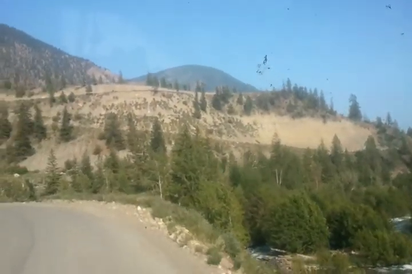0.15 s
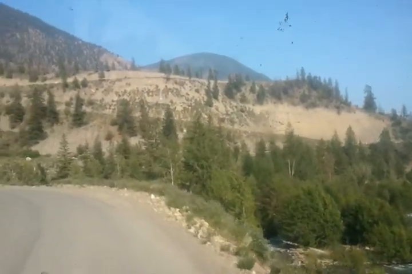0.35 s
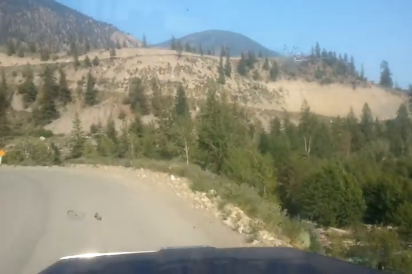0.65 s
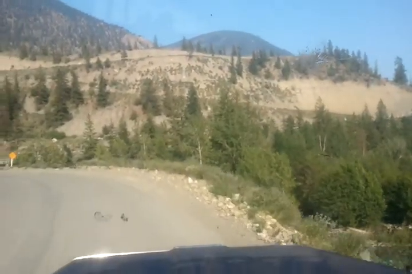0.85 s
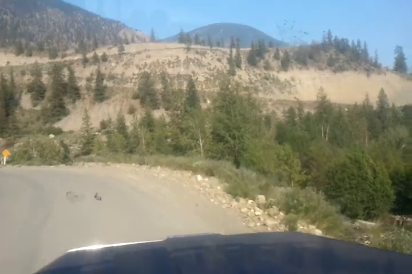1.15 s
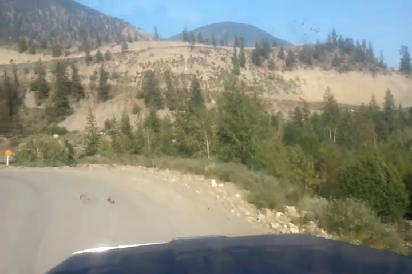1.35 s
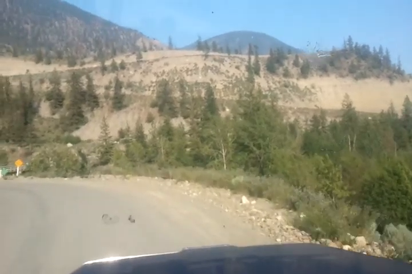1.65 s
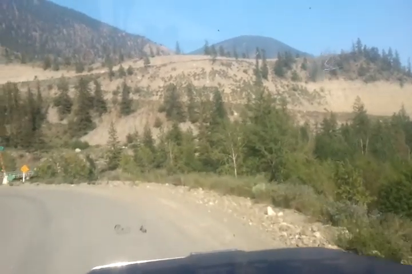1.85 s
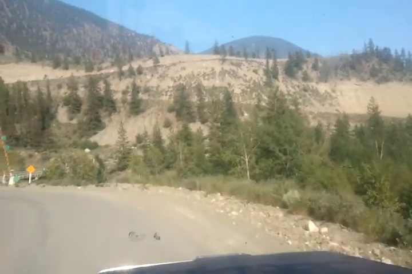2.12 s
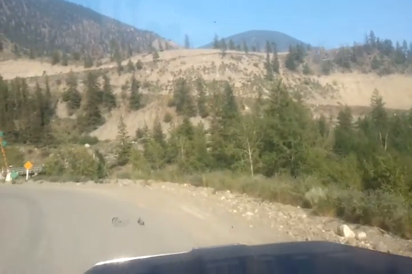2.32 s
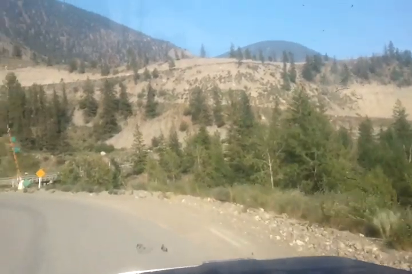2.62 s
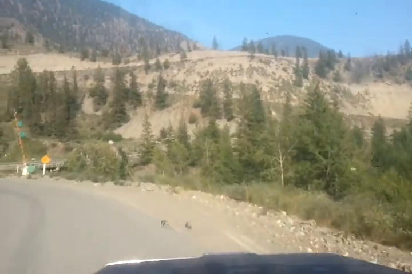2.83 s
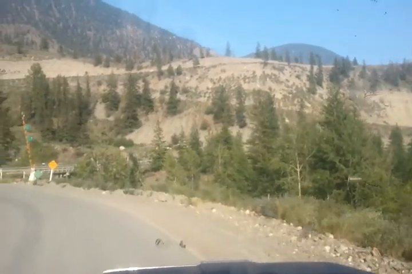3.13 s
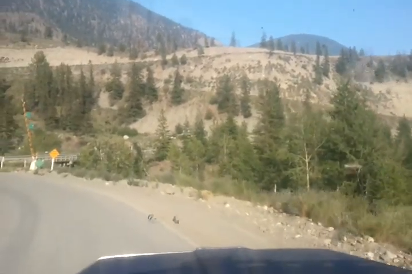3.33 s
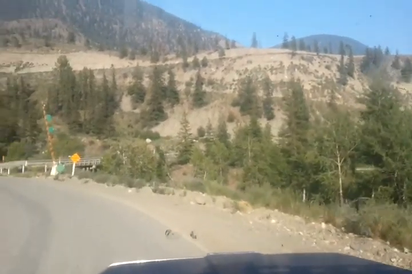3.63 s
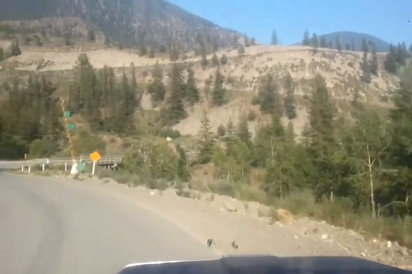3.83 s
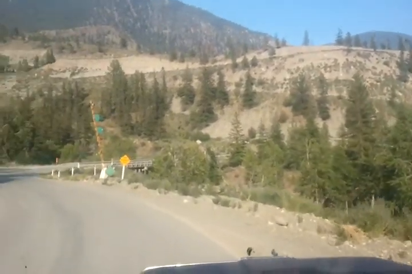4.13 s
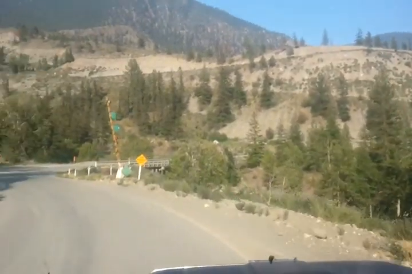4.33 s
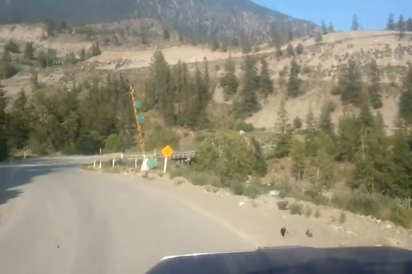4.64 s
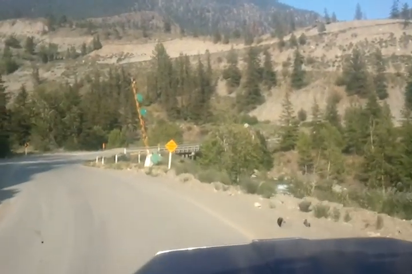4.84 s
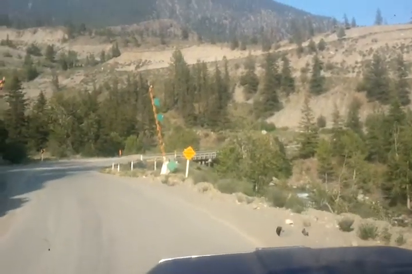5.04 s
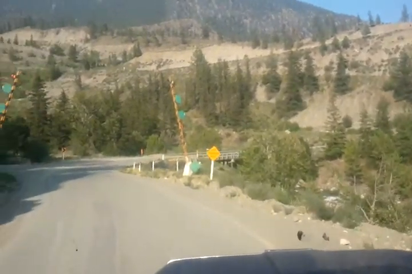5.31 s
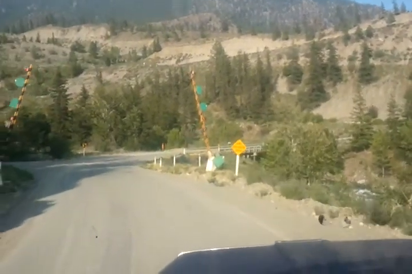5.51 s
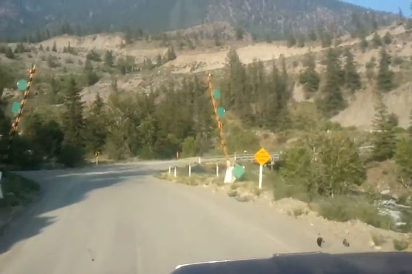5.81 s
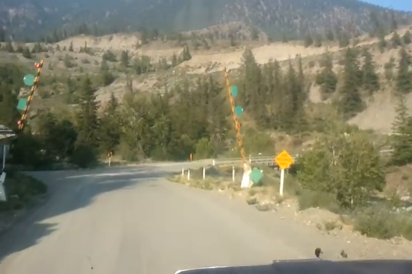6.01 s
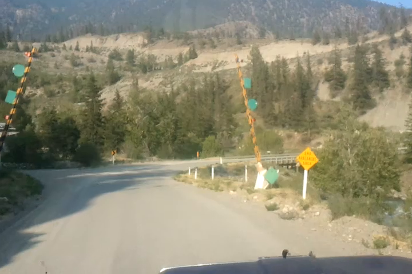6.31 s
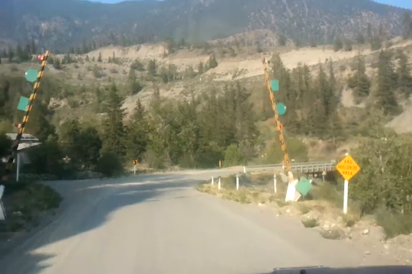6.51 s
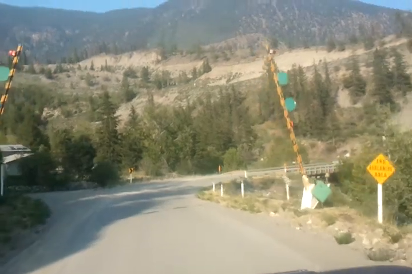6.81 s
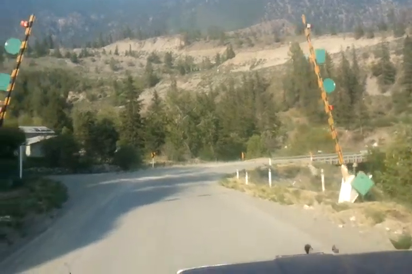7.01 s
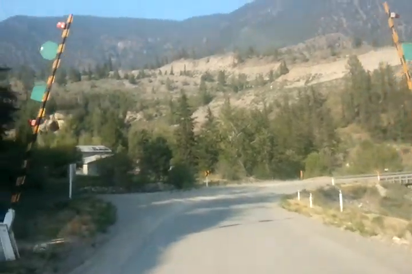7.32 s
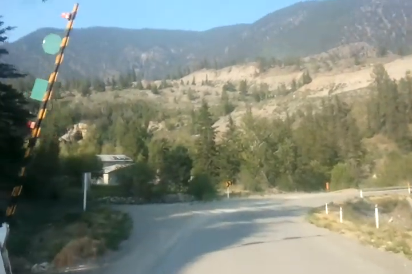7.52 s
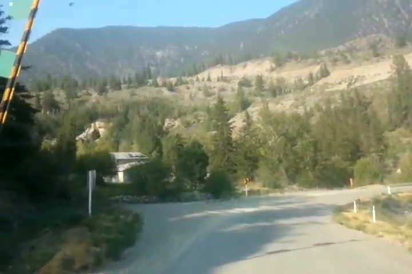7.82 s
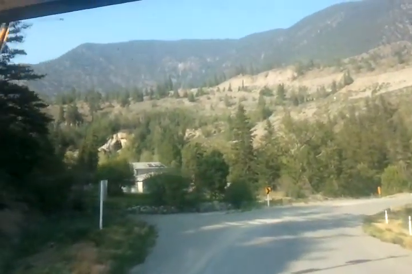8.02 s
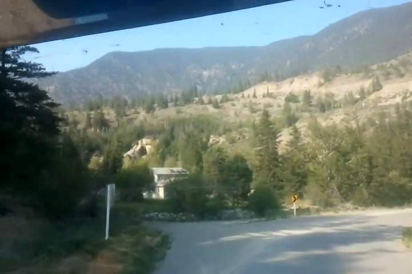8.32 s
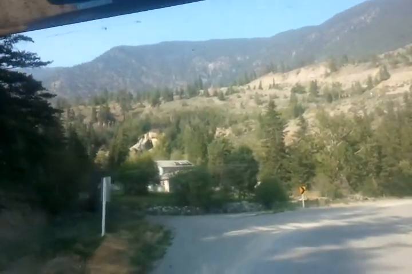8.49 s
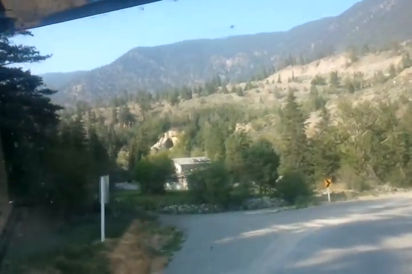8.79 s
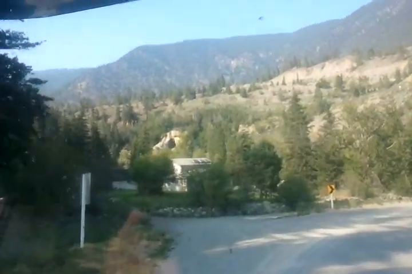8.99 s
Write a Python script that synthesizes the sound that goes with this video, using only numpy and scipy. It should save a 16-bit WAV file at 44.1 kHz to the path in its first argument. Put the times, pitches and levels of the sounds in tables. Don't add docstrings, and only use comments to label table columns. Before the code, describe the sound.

From the start, the cab of a six-cylinder diesel truck is filled by an exhaust brake: a very loud, low, throbbing drone of about forty-five pulses a second, uneven from cylinder to cylinder, clipped into a harsh buzz by a small microphone. Air hiss and cab noise break through in flutters, and plastic trim rattles irregularly; a small jolt comes near 1.0. The pitch sinks gradually until about 4.9, when the brake lets go with a brief low tail. From 5.1 it is far quieter: muffled road rumble, soft diesel clatter, faint whines and a low shudder. The engine pulls lightly, eases around 6.6, then hums more strongly from 7.2 to 8.3, rising slightly. At 8.33 the brake bites again, loud and distorted, as wheels thud rapidly over grid bars with a sharp trim knock near 8.53. By 9.0 it releases, leaving rumble and a faint engine.

```python
import sys
import numpy as np
from scipy import signal
from scipy.fft import rfft, irfft, next_fast_len
from scipy.io import wavfile
from scipy.ndimage import uniform_filter1d, map_coordinates

SR = 44100
rng = np.random.default_rng(int(sys.argv[2]) if len(sys.argv) > 2 else 0)


def to_linear_factor(level_db):
    exponent = np.asarray(level_db, float) / 20
    return 10 ** exponent


def digitize_waveform(pressure):
    field = np.atleast_2d(pressure).T
    bounded = np.clip(field, -1, 1)
    quanta = np.round(bounded * 32767).astype(np.int16)
    wavfile.write(sys.argv[1], SR, quanta)


N = 403515

# (time [s], firing rate [1/s])
SPEED_ROWS = [
    (0, 45.38),
    (2.2, 42.73),
    (4.1, 40.8),
    (5.1, 40.53),
    (6.5, 41.42),
    (8.2, 42.67),
    (8.55, 41.83),
    (8.9, 40.95),
    (9.15, 39.89),
]
# (on [s], off [s], linger [s], boom [dB])
BRAKE_SPANS = [
    (-1, 4.92, .068, 0),
    (8.328, 8.935, .04, 2.5),
]
# (lag [firings], push [dB], pipe ring [dB])
PULSE_RISES = [(.032, 9.2, .9), (.085, 3, -15.6), (-.048, 4.9, -6.7), (.023, 9, -.3), (.02, 8.2, -5.6),
               (-.026, 11.6, -4.4)]
# (lag [firings], push [dB], pipe ring [dB])
PULSE_FALLS = [(.061, 7.6, -6.4), (.01, 1.6, -14.4), (.02, 12.2, 5), (.029, 8.9, -8.7), (.023, 11.2, -3.5),
               (.02, 10.4, 1.4)]
# (frequency [Hz], density [dB/Hz])
BLOW_OFF_SPECTRUM = [(40, -36.5), (150, -2), (400, -9.5), (700, -29), (1100, -21), (1700, -37), (2700, -25),
                     (4000, -27), (4500, -31.5), (5800, -30.5), (6400, -26), (7500, -30), (10000, -16.5),
                     (20000, -120)]
# (time [s], firing tone [dB])
PULL_LEVELS = [
    (5.05, -30),
    (5.3, -23),
    (5.5, -17),
    (6.2, -14),
    (6.65, -19),
    (7.25, -10.5),
    (8.3, -8.5),
    (9.0, -20),
    (9.15, -26.5),
]
# (multiple of firing rate [-], level [dB])
CRANK_ORDERS = [(3 / 6, -30.5), (7 / 6, -33.5), (8 / 6, -36.5), (19 / 6, -37), (21 / 6, -32),
                (9 / 6, -27.5), (11 / 6, -27.5), (12 / 6, -26.5), (14 / 6, -36.5), (15 / 6, -28.5),
                (28 / 6, -35)]
# (start [s], end [s], first pitch [Hz], last pitch [Hz], level [dB])
SHUDDER_GLIDES = [
    (5.1, 5.8, 32.6, 33.7, -18),
    (6.3, 6.9, 32, 21.5, -17),
]
# (frequency [Hz], density [dB/Hz])
RUMBLE_SPECTRUM = [(8, -42), (20, -3), (30, -1.5), (45, -13), (65, -7.5), (95, -7), (160, -7.5), (200, -9),
                   (260, -11), (430, -13), (620, -30), (900, -48.5), (2000, -120)]
# (frequency [Hz], density [dB/Hz])
CLATTER_SPECTRUM = [(290, -39), (500, -7), (680, -7), (970, -3), (1470, -5), (1650, -9.5), (1950, -9.5),
                    (2600, -16.5), (3600, -19.5), (4700, -26.5), (6000, -28), (7500, -25.5), (9000, -25),
                    (18700, -120)]
# (centre [Hz], width [Hz], lift over the noise [dB])
PANEL_MODES = [(200, 30, 0), (373, 11, 4.5), (428, 15, 4), (485, 10, 4.5), (766, 30, 4), (1003, 120, 1.5),
               (1200, 52, 1.5), (1490, 27, -1), (1975, 44, 4), (3390, 56, 0.5), (6260, 250, 2),
               (670, 110, -2), (1207, 28, -7)]
# (start [s], end [s], first pitch [Hz], last pitch [Hz], level [dB])
WHINE_GLIDES = [(5.35, 6.1, 200, 200, -27), (6.45, 7.1, 200, 205, -28), (7.5, 9.3, 198, 202, -28),
                (8.5, 9.3, 205, 200, -20), (4.94, 5.4, 436, 422, -30), (6.35, 8.5, 431, 430, -33),
                (4.94, 8.2, 1000, 1008, -33), (7.6, 8.4, 1150, 1180, -37), (8.93, 9.4, 1130, 1030, -32),
                (5.9, 8.5, 1488, 1515, -37), (4.93, 5.3, 1988, 1960, -33), (5.2, 5.8, 1955, 1915, -41),
                (5.15, 5.7, 3424, 3395, -47), (6.7, 7.5, 3390, 3345, -50), (4.95, 5.45, 3720, 3610, -46)]
# (time [s], peak [dB], ring [Hz])
RATTLE_HITS = [(0.028, -10.5, 900), (0.08, -11, 887), (0.257, -3, 756), (0.525, -10.5, 956),
               (0.66, -8, 1030), (0.929, -7, 1140), (0.996, -15, 766), (1.132, -16, 763),
               (1.203, -7.5, 1145), (1.612, -12, 1144), (1.682, -13.5, 1086), (1.75, -21, 1083),
               (1.888, -8.5, 990), (1.995, -14, 910), (2.169, -14.5, 870), (2.239, -11, 748),
               (2.309, -6.5, 1077), (2.44, -12, 1100), (2.522, -14.5, 1080), (2.617, -20, 850),
               (2.737, -13, 1070), (2.806, -15, 832), (2.864, -12, 793), (2.915, -14, 1135),
               (3.222, -14, 1490), (3.525, -9, 1010), (3.719, -9.5, 1100), (3.817, -7, 1057),
               (4.293, -17, 844), (4.403, -13.5, 1007)]
# (time [s], peak [dB], thud [Hz], t60 [s], trim knock [dB])
JOLT_HITS = [(.997, 2.5, 293, 0.06, -12), (8.336, 5.5, 214.4, 0.19, -7.5), (8.352, 3.5, 294, 0.11, -14.5),
             (8.43, -12, 253, .08, -22), (8.478, -6.5, 289, 0.11, -18), (8.5323, 6, 206.6, 0.16, 3),
             (8.545, -4.5, 258, 0.054, -14.5), (8.566, 4, 244, 0.076, -10.5), (8.602, 4, 200, 0.046, -15.5),
             (8.65, -7.5, 258, 0.044, -20.5), (8.706, -0.5, 213, 0.18, -27.5), (8.765, 0.5, 201, 0.16, -30),
             (8.832, -1.5, 252, 0.089, -29)]
# (frequency [Hz], density [dB/Hz])
SMEAR_SPECTRUM = [(300, -48.5), (1500, -2), (3000, -5), (7000, -5.5), (8500, -8.5), (10000, -66.5),
                  (20000, -120)]


def seconds(count=N):
    return np.arange(count) / SR


def unit(x):
    return x / np.sqrt(np.mean(x ** 2) + 1e-20)


def curve(rows):
    s, value = np.transpose(rows)
    return np.interp(seconds(), s, value)


def wobble(rate_hz, count=N):
    knots = rng.standard_normal(int(count * rate_hz / SR) + 4)
    return map_coordinates(knots, [np.arange(count) * rate_hz / SR])


def filtered(x, response):
    m = next_fast_len(N + 8192)
    return irfft(rfft(x, m) * response(np.fft.rfftfreq(m, 1 / SR)), m)[:N]


def noise(spectrum, modes=()):
    hz, db = np.transpose(spectrum)

    def response(f):
        bumps_db = sum(lift_db / (1 + (2 * (f - centre) / width) ** 2) for centre, width, lift_db in modes)
        return to_linear_factor(np.interp(np.log(f + 1), np.log(hz), db) + bumps_db)

    return unit(filtered(rng.standard_normal(N), response))


def glide(start_s, end_s, hz, last_hz):
    t = seconds(round((end_s - start_s) * SR))
    rise_s, fade_share = .06, .4
    size = np.clip(np.minimum(t / rise_s, (t[-1] - t) / (fade_share * t[-1])), 0, 1)
    turn = 2 * np.pi * np.cumsum(np.linspace(hz, last_hz, len(t))) / SR
    return round(start_s * SR), turn, size


def braking():
    bite_s, build_s, drop_s, stop_s = .035, .15, .045, .02
    bite, low = to_linear_factor(-5.5), to_linear_factor(-12.5)
    pressure = np.zeros(N)
    for on_s, off_s, linger_s, db in BRAKE_SPANS:
        hold_s = off_s - on_s - bite_s - build_s
        knots_s = np.cumsum([on_s, bite_s, build_s, hold_s, drop_s, linger_s, stop_s])
        pressure += to_linear_factor(db) * np.interp(seconds(), knots_s, [0, bite, 1, 1, low, low, 0])
    return pressure


def cab(firings):
    rumble_db, clatter_db, braked_db, settle_s = -20.5, -25.6, 4, 1.1
    braked = np.clip(braking(), 0, 1)
    grid_db = np.interp(seconds(), [8.3, 8.6, 9.2], [0, 7, 0])
    rumble_db = rumble_db + braked_db * braked + grid_db
    clatter_db = clatter_db + braked_db * uniform_filter1d(braked, round(settle_s * SR))
    rumble = to_linear_factor(rumble_db + 1.2 * wobble(8.1)) * noise(RUMBLE_SPECTRUM, PANEL_MODES)
    pulse = unit(np.exp(0.063 * np.cos(2 * np.pi * (firings - 0.14))))
    pulse = pulse * to_linear_factor(0.64 * wobble(6.1) + 0.3 * wobble(90))
    return rumble + to_linear_factor(clatter_db) * unit(pulse * noise(CLATTER_SPECTRUM, PANEL_MODES))


def whines():
    out = np.zeros(N + SR)
    for start_s, end_s, hz, last_hz, db in WHINE_GLIDES:
        at, turn, size = glide(start_s, end_s, hz, last_hz)
        flutter_hz = 16 + hz / 50
        in_phase = (.6 + wobble(flutter_hz, len(turn))) * np.cos(turn)
        quadrature = wobble(flutter_hz, len(turn)) * np.sin(turn)
        out[at:at + len(turn)] += to_linear_factor(db) * size * (in_phase + quadrature)
    return out[:N]


def rattles():
    out, t = np.zeros(N + SR), seconds(SR // 20)
    envelope = to_linear_factor(-60 * t / .014) * (1 - np.exp(-t / .0006))
    for s, db, hz in RATTLE_HITS:
        at = round(s * SR)
        out[at:at + len(t)] += to_linear_factor(db + 4.5) * np.sin(2 * np.pi * hz * t) * envelope
    return out[:N]


def jolts():
    out, t = np.zeros(N + SR), seconds(SR // 4)
    knock = np.sin(2 * np.pi * 1050 * t) + .6 * np.sin(2 * np.pi * 690 * t)
    knock = knock * to_linear_factor(-60 * t / 0.024) * (1 - np.exp(-t / 0.0011))
    for s, db, hz, t60_s, knock_db in JOLT_HITS:
        at = round(s * SR)
        thud = np.sin(2 * np.pi * hz * t) * to_linear_factor(-60 * t / t60_s)
        out[at:at + len(t)] += to_linear_factor(db) * (thud + to_linear_factor(knock_db) * knock)
    return out[:N]


def shudders():
    out = np.zeros(N + SR)
    for *slide, db in SHUDDER_GLIDES:
        at, turn, size = glide(*slide)
        out[at:at + len(turn)] += to_linear_factor(db + 1.2 * wobble(6, len(turn))) * size * np.cos(turn)
    return out[:N]


def pulling(firings, faster_hz):
    tone_db = curve(PULL_LEVELS)
    third_db = -19 + 3 * faster_hz
    turn = 2 * np.pi * firings
    hunt_db = .45 * np.clip(-10 - tone_db, 0, 6)
    tones = to_linear_factor(tone_db + hunt_db * wobble(6)) * np.cos(turn + .12 * hunt_db * wobble(5))
    tones = tones + to_linear_factor(third_db + 0.41 * wobble(28)) * np.cos(3 * turn + 1.3)
    for order, db in CRANK_ORDERS:
        tones = tones + to_linear_factor(db + 3.8 * wobble(4.5)) * np.cos(order * turn + 2 * np.pi * rng.random())
    fuel_cut = np.clip(4 * braking(), 0, 1)
    coasting = np.interp(seconds(), [9.0, 9.03], [1, .8])
    return np.sqrt(2) * ((1 - fuel_cut) * coasting * tones + shudders())


def brake(firings, faster_hz):
    beat = firings - .2
    swing = [2 * (beat + .25) % 12]
    pairs = np.stack([PULSE_RISES, PULSE_FALLS], axis=2)
    lag, push_db, ring_db = (map_coordinates(pairs[:, k].ravel(), swing, order=1, mode="grid-wrap")
                             for k in range(3))
    t = seconds()
    sag_hz = 2.4
    sag = sag_hz * sum((t - off_s) * (t > off_s) * (t < off_s + .2) for _, off_s, *_ in BRAKE_SPANS)
    turn = 2 * np.pi * (beat - lag - sag - 0.0039 * wobble(30))
    uneven = 0.98 + 0.09 * faster_hz
    boom = to_linear_factor(10 + uneven * (push_db - 10) + 0.62 * wobble(25)) * np.cos(turn)
    ring = to_linear_factor(ring_db + 1.5 * wobble(25)) * np.cos(3 * turn - .7)
    blow = to_linear_factor(-18 + 1.3 * wobble(14)) * noise(BLOW_OFF_SPECTRUM)
    return braking() * (to_linear_factor(.7 * faster_hz) * (boom + ring) + blow)


def scene():
    rate_hz = curve(SPEED_ROWS)
    firings = -.27 + np.cumsum(rate_hz) / SR
    faster_hz = rate_hz - 42
    background = cab(firings) + whines() + rattles() + jolts()
    engine = pulling(firings, faster_hz) + brake(firings, faster_hz)
    return (background + engine)[None]


def roll_off(x):
    return signal.sosfilt(signal.butter(12, 16500, fs=SR, output="sos"), x)


def record(dry):
    full_scale, overshoot_limit = .705, .708
    clipped = np.clip(dry[0], -full_scale, full_scale)
    dull = filtered(clipped, lambda hz: (1 + (hz / 8000) ** 26) ** -1.5)
    smeared = dull + to_linear_factor(-53 + 6.5 * wobble(60)) * noise(SMEAR_SPECTRUM)
    mix = np.clip(smeared, -overshoot_limit, overshoot_limit)[None]
    return roll_off(mix)


dry = scene()
out = record(dry)
digitize_waveform(out)
```